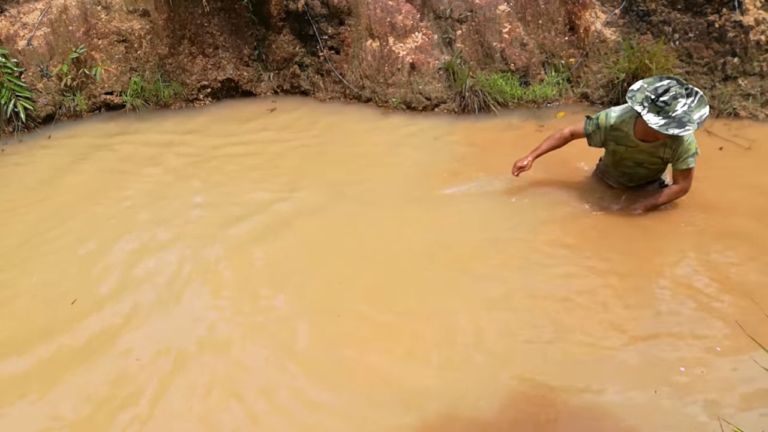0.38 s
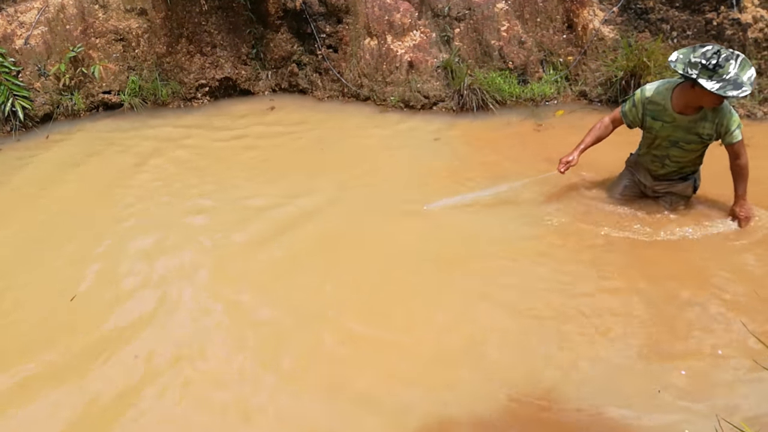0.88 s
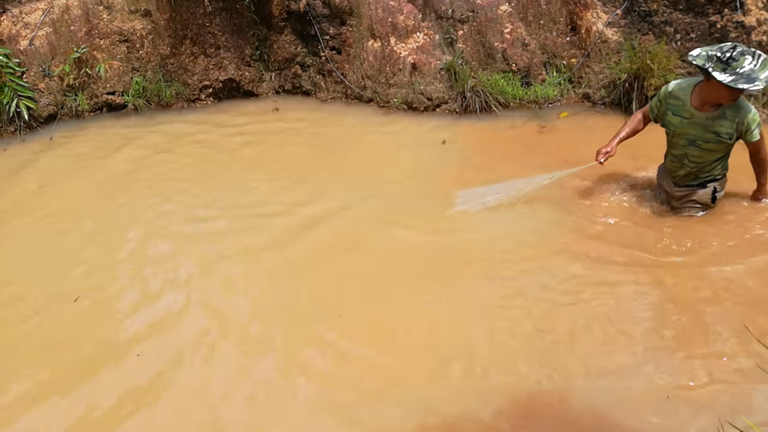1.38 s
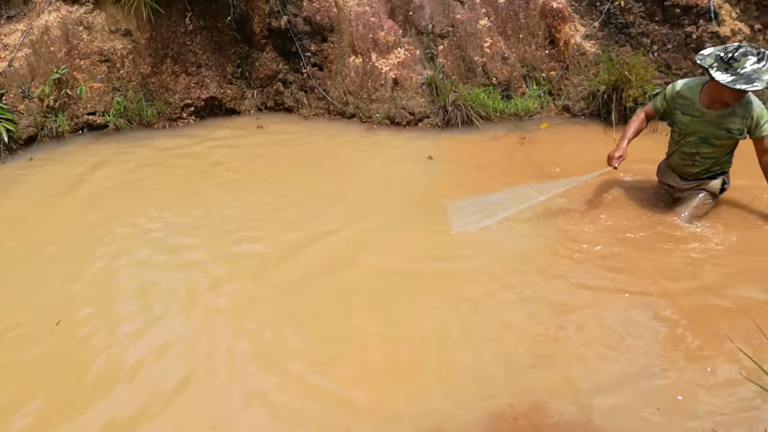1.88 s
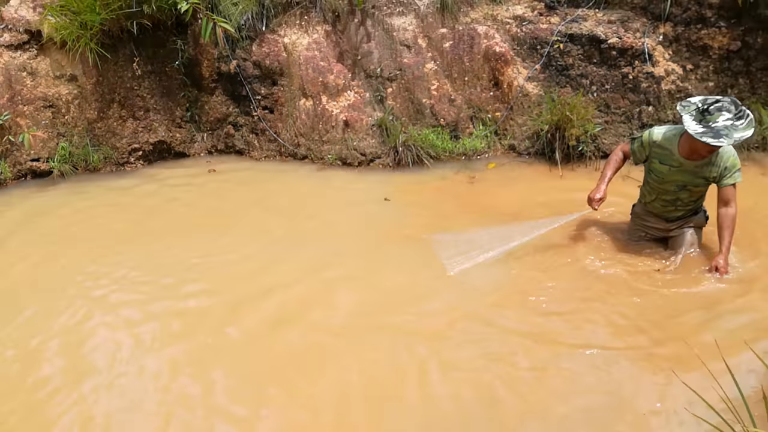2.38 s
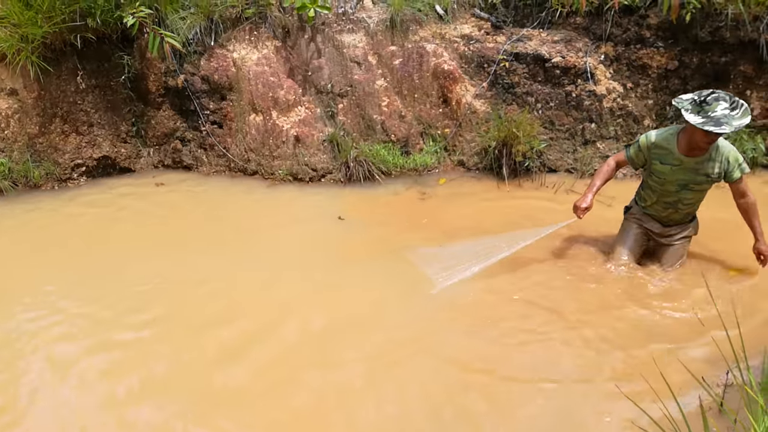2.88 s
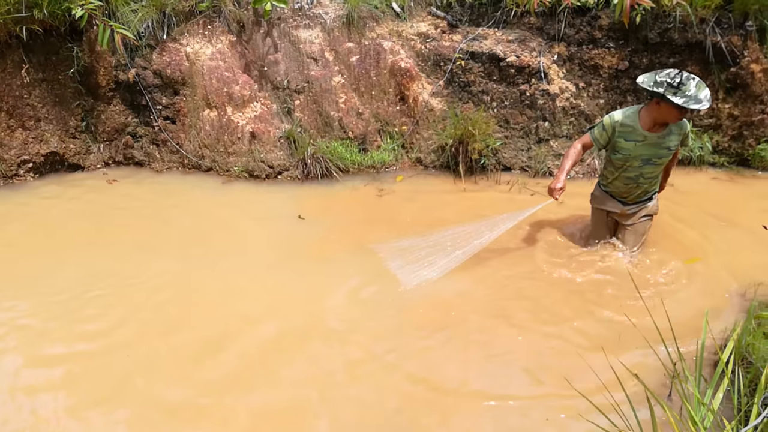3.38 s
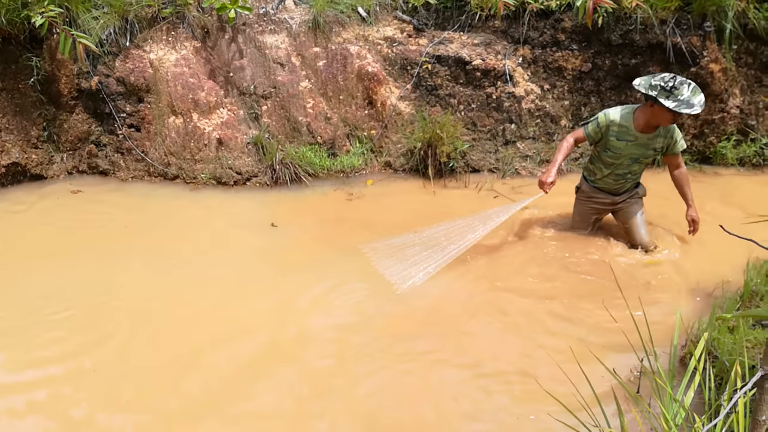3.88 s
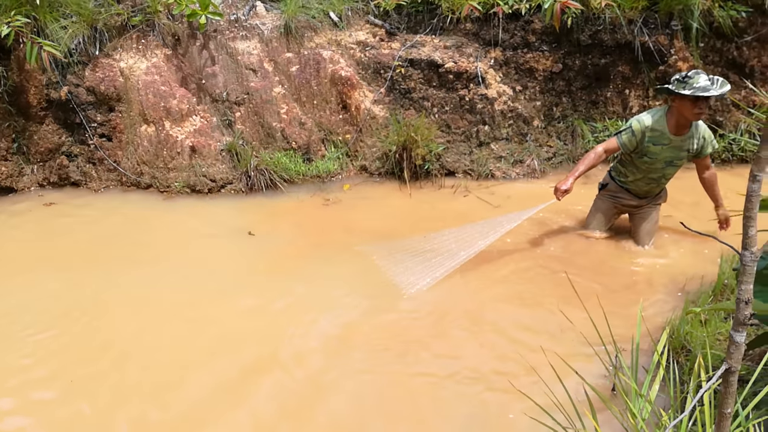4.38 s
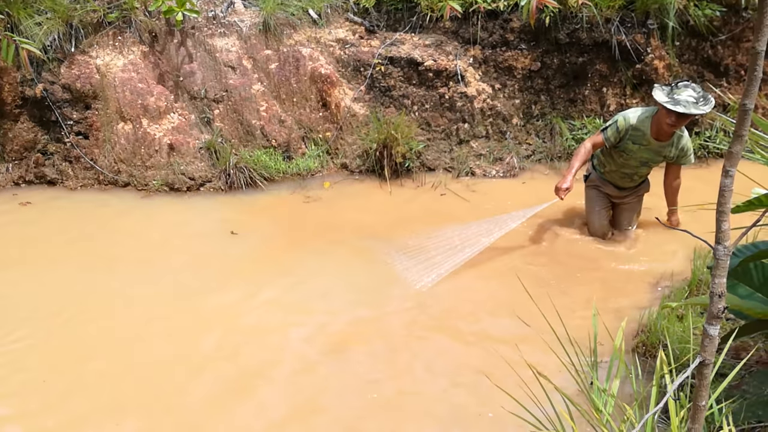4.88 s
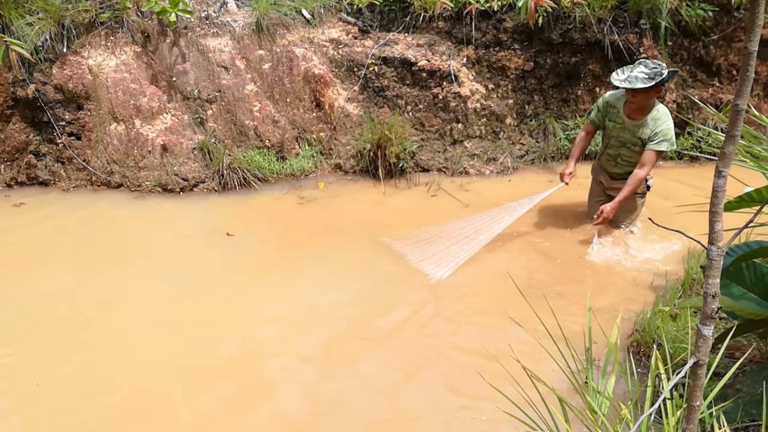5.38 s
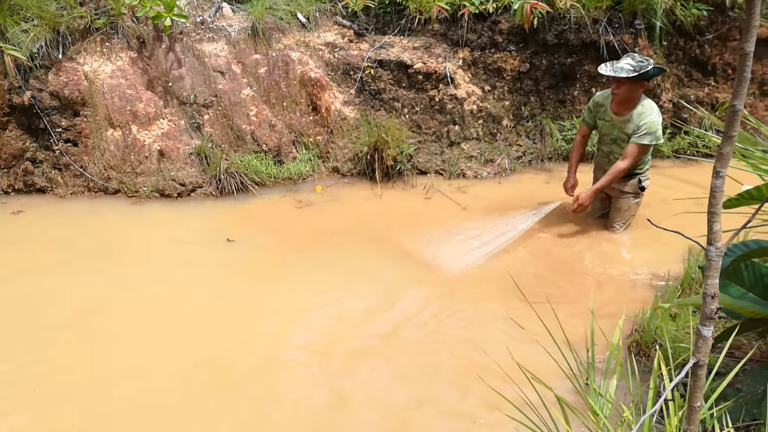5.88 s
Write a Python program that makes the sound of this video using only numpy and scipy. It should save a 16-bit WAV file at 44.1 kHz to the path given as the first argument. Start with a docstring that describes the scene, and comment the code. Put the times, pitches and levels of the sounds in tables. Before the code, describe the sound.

A stereo outdoor take beside a muddy pond, with faint hiss and a distant hush. Low wind thumps buffet the microphone in the first 0.4 seconds. From about 0.2 someone wades, sloshing bubbly water with spray and a net draining in a smooth hiss until 0.9. At 1.05 to 1.55 come stronger glugs, plops and crisp slaps. Water thins, then stirs again from 1.85 to 2.6, with softer gurgles and a short drain. Around 3.0 wind thumps return and a heavy splash with a deep plop lands at 3.2; sloshing and net hiss continue to about 4.0. A lull follows, filled by wind gusts at 4.1 to 4.75. Slosh and drain hiss resume at 4.4, with plops and slaps through 5.4. It quietens until a tiny swish at 6.0. Water is bright on the right, late and dull on the left, with a short earthy echo.

```python
"""Gusty wind buffets two microphone ports as someone wades through a muddy pond, dragging a net.
From the first stride on, the right, bubbles and spray slosh, wavelets slap and air pockets plop and glug.
Water drains through the net in smooth hisses, often while the slosh goes on; a swish comes at the end.
Noise and many small bubbles make the slosh, gliding tones the pockets, one-cycle puffs the wind.
The left port is shaded by the camera body and hears the water late and dull."""
import sys
import numpy as np
from scipy import signal
from scipy.fft import rfft, irfft, next_fast_len
from scipy.io import wavfile
from scipy.ndimage import uniform_filter1d, map_coordinates

SR = 44100
rng = np.random.default_rng(int(sys.argv[2]) if len(sys.argv) > 2 else 0)


def unload_audio(sound):
    """Save the sound as a 16-bit wav file, at the path given as the first command line argument."""
    columns = np.transpose(np.atleast_2d(sound))
    # keep every value between -1 and 1, then stretch to whole-number steps
    steps = np.round(np.clip(columns, -1, 1) * 32767)
    wavfile.write(sys.argv[1], SR, steps.astype(np.int16))


def voltage_ratio(level):
    """Linear amplitude factor for a level in decibels (scalar or array-like)."""
    return 10 ** (np.asarray(level, float) / 20)


N = 265482


def unit(x):
    """Scales a sound to an average strength (rms) of 1."""
    return x / np.sqrt(np.mean(x ** 2) + 1e-20)


def along(points, hz, axis=1):
    """Reads one column of a frequency table, with frequency on a log scale."""
    table = np.transpose(points)
    # a column that starts very low is silent below its first frequency
    below = -120 if table[axis][0] < -25 else None
    return np.interp(np.log(hz + 1), np.log(table[0] + 1), table[axis], below)


def wobble(rate):
    """A smooth random curve with this many random knots a second."""
    knots = rng.standard_normal(int(N * rate / SR) + 4)
    return map_coordinates(knots, [np.arange(N) * rate / SR])


def filtered(x, response):
    """Multiplies the spectrum of a sound by a response, which may also shift phase."""
    m = next_fast_len(N + 8192)
    hz = np.fft.rfftfreq(m, 1 / SR)
    return irfft(rfft(x, m) * response(hz), m)[..., :N]


def coloured(x, spectrum):
    """Shapes a sound by a table of frequencies and levels, then brings it to rms 1."""
    return unit(filtered(x, lambda hz: voltage_ratio(along(spectrum, hz))))


def patchy(x, depth_db, bins, frames):
    """Raises and lowers random blotches of the sound over time and frequency."""
    z = signal.stft(x, nperseg=256)[2]
    field = uniform_filter1d(rng.standard_normal(z.shape), bins, 0)
    field = uniform_filter1d(field, frames, 1)
    return signal.istft(z * voltage_ratio(depth_db * unit(field)), nperseg=256)[1][:N]


def place(s, shapes):
    """Adds up short shapes, one row for each start time in seconds."""
    at = np.round(s * SR).astype(int)[:, None] + np.arange(shapes.shape[1])
    return np.bincount(np.clip(at, 0, N).ravel(), shapes.ravel(), N + 1)[:N]


def preamp_hiss():
    """Each port's preamplifier adds its own random electrical noise."""
    # Each row: frequency in Hz, relative level in dB
    hiss_colour = [(200, -10), (350, -6), (1500, -2.5), (3000, -9), (6000, -13), (8000, -18.5),
                   (14800, -18.5), (15350, -16.5)]
    return voltage_ratio(-79.5) * coloured(rng.standard_normal((2, N)), hiss_colour)


def camera_whine():
    """Faint high camera tones whose phase drifts a little, 8 dB weaker on the left."""
    # Each row: frequency in Hz, peak level on the right in dB
    tones = [(11601, -103), (15240, -102), (15450, -99)]
    whine = np.zeros(N)
    for hz, db in tones:
        drift_rad = 0.51 * wobble(4)
        whine += voltage_ratio(db) * np.sin(2 * np.pi * hz * np.arange(N) / SR + drift_rad)
    return whine * voltage_ratio([[-8], [0]])


def far_hush():
    """A far outdoor hush: coloured noise whose level wanders slowly."""
    # Each row: frequency in Hz, relative level in dB
    hush_colour = [(200, -28), (400, 0), (1400, -6), (3500, 1), (5500, -3), (7000, -26), (9000, -45)]
    hush_db = -85 + wobble(3)
    return voltage_ratio(hush_db) * coloured(rng.standard_normal(N), hush_colour)


def wind():
    """Air swirls make a lumpy low rumble that flares higher in the lumps; puffs thump for about a cycle."""
    # Wind between the puffs. Each row: time in seconds, level in dB
    gusts = [(0.0, -43), (0.2, -45), (0.33, -56), (1.42, -60), (1.83, -70), (2.06, -73.5), (2.09, -52.5),
             (2.43, -62), (2.7, -61), (2.93, -51), (3.5, -53.5), (3.96, -61.5), (4.3, -45), (4.76, -56),
             (4.84, -68), (5.01, -64.5), (5.15, -53), (5.78, -56.5), (6.02, -65)]
    # Single puffs of air. Each row: time of the middle in seconds, level in dB, pitch in Hz,
    # level of the sharp edge in dB relative to the puff
    puffs = [(0.071, -40.5, 79.6, -27), (0.124, -31.5, 92, -12), (0.151, -32.5, 117, -25),
             (0.174, -32.5, 84, -12), (0.22, -40, 102, -21), (0.251, -37.5, 71, -21),
             (0.275, -36.5, 110, -17), (0.304, -39.5, 117, -24), (0.366, -42, 83, -8.5),
             (0.385, -40, 73, -13), (0.733, -40, 83, -23), (0.767, -38.5, 99, -14.5),
             (1.156, -36.5, 64, -35), (1.449, -40.5, 73, -28), (1.491, -46, 105, -25),
             (1.53, -43, 80.5, -22), (2.82, -46, 69, -18), (2.93, -49, 80, -7), (2.975, -34, 97, -14),
             (3.1, -33.5, 106, -12.5), (3.163, -35.5, 98, -13), (3.309, -39.5, 116, -13),
             (3.856, -40, 72.4, -13), (4.114, -38.5, 84, -30), (4.133, -38.5, 61, -35),
             (4.189, -37.5, 80, -19), (4.211, -41, 110, -11), (4.263, -46.5, 92, -12), (4.321, -38, 113, 0),
             (4.352, -34, 93, -21), (4.406, -41, 70, -25), (4.454, -33.5, 95, -13.5),
             (4.496, -33.5, 71.6, -9), (4.517, -41.5, 80, -12), (4.596, -37, 122, -15),
             (4.745, -36, 63, -26), (5.227, -40.5, 95, -6), (5.32, -43, 83.4, -7), (5.38, -45, 85, -24),
             (5.489, -43.5, 85, -13.5), (5.62, -47, 87, -16), (5.712, -49, 84, -11.5),
             (5.885, -47.5, 69.6, -30)]
    # Colours of the rumble and its upper part. Each row: frequency in Hz, relative level in dB
    rumble_colour = [(12, -31.5), (25, -0.5), (50, 2.5), (110, -5.5), (160, -14.5), (250, -51), (500, -85)]
    flap_colour = [(90, -41), (150, 2.5), (220, 0), (320, -19), (500, -50.5)]

    lumps = wobble(16)
    swirl = rng.standard_normal(N) + 0.14 * rng.standard_normal((2, N))  # mostly shared by both ports
    rumble = unit(voltage_ratio(2.6 * lumps) * coloured(swirl, rumble_colour))
    shared_flap = coloured(rng.standard_normal(N), flap_colour)
    flap = shared_flap + 0.59 * coloured(rng.standard_normal((2, N)), flap_colour)
    flare_db = 6.4 * np.minimum(lumps, 1.3) + 6.3 * wobble(45)
    flare = voltage_ratio(-14.5) * unit(voltage_ratio(flare_db) * flap)
    gust_s, gust_db = np.transpose(gusts)
    between = voltage_ratio(np.interp(np.arange(N) / SR, gust_s, gust_db)) * (rumble + flare)

    s, db, hz, edge_db = np.transpose(puffs)[:, :, None]
    t = np.arange(-1300, 1300) / SR  # the puff is strongest at zero
    phase = rng.random((len(s), 2, 1))
    body = np.exp(-(t * hz / 0.39) ** 2) * np.cos(2 * np.pi * (hz * t + phase[:, 0]))
    edge = np.exp(-(t / 0.0029) ** 2) * np.cos(2 * np.pi * (240 * t + phase[:, 1]))
    return between + place(s[:, 0] + t[0], voltage_ratio(db) * (body + voltage_ratio(edge_db) * edge))


def banks(x):
    """Earth banks send back a short echo tail, different at each port; the treble dies sooner."""
    # Each row: frequency in Hz, time to fall by 60 dB in seconds
    dying = [(300, 0.25), (2000, 0.18), (8000, 0.13)]
    hz, t, z = signal.stft(rng.standard_normal((2, SR // 4)), SR, nperseg=256)
    fading = voltage_ratio(-60 * t / along(dying, hz)[:, None])
    tail = signal.istft(z * fading, SR, nperseg=256)[1]
    tail = tail / np.linalg.norm(tail[0])
    late = np.pad(x, (250, 0))[None]  # delay in samples
    return signal.fftconvolve(late, tail, axes=1)[:, :N]


def net():
    """Water drains through the lifted net in countless tiny drops: a smooth, slightly blotchy hiss."""
    # Each row: start in seconds, length in seconds, level in dB, swell in dB per second
    draining = [(0.304, 0.58, -71, -1.5), (1.912, 0.32, -76.5, 3), (3.0, 0.96, -71.5, -5.5),
                (4.417, 0.39, -68.5, -12), (4.846, 0.48, -76, 21)]
    # Each row: frequency in Hz, relative level in dB
    trickle_colour = [(1200, -39), (1900, -1.5), (3000, -2), (4500, 4), (5600, -9.5), (7000, -29),
                      (10000, -43)]
    attack_s, release_db_per_s = 0.062, 152
    t = np.arange(N) / SR
    s, length, db, swell = np.transpose(draining)[:, :, None]
    age = np.maximum(t - s, 0)
    level_db = db + swell * np.minimum(age, length) - release_db_per_s * np.maximum(age - length, 0)
    flow = (voltage_ratio(level_db) * np.tanh(age / attack_s)).sum(0)
    trickle = coloured(rng.standard_normal(N), trickle_colour)
    return flow * unit(patchy(trickle, 2.1, bins=2, frames=20))


def swish():
    """Fast-flickering hiss under a bell-shaped swell."""
    # Each row: frequency in Hz, relative level in dB
    hiss_colour = [(590, -44), (1000, -20), (1640, -19), (2020, -12), (2480, -5), (4370, 3.5), (4960, 1),
                   (5960, -3), (15700, -26.5)]
    peak_s, width_s = 6.005, 0.015
    swell = np.exp(-((np.arange(N) / SR - peak_s) / width_s) ** 2 / 2)
    flicker_db = -47.5 + 2.2 * wobble(300)
    return swell * voltage_ratio(flicker_db) * coloured(rng.standard_normal(N), hiss_colour)


def ticks():
    """Tiny ticks of spray: short sparks of bright noise."""
    # Each row: start in seconds, level in dB before the boost and colour below
    sparks = [(0.1722, -72), (0.353, -60), (1.2138, -72), (1.2737, -68), (2.0614, -62), (2.1197, -66),
              (2.1487, -65), (3.0052, -66), (3.0456, -77), (3.1619, -65), (3.1948, -56), (3.3135, -72),
              (3.8493, -64), (4.457, -54), (4.7562, -72), (5.8543, -73)]
    # Each row: frequency in Hz, gain in dB
    sparkle_colour = [(6000, -30), (8300, 4), (10500, 6), (11800, -4), (15700, -8)]
    t60_s, boost_db = 0.02, 2.5
    s, db = np.transpose(sparks)[:, :, None]
    t = np.arange(900) / SR
    fading = voltage_ratio(db + boost_db - 60 * t / t60_s) * np.tanh(t / 0.0016)
    noise = rng.standard_normal((len(s), len(t)))
    return filtered(place(s[:, 0], fading * noise), lambda hz: voltage_ratio(along(sparkle_colour, hz)))


def slaps():
    """Wavelets and drops slap the surface: a ringing click, then droplets at scattered pitches."""
    # Each row: start in seconds, reference level in dB, pitch in Hz
    hits = [(0.171, -54, 2300), (0.179, -55, 3420), (0.3248, -38, 2130), (0.611, -43.5, 4080),
            (0.7036, -48, 5800), (0.7792, -47, 3700), (1.1975, -38.5, 2090), (1.2351, -36.5, 3770),
            (1.2473, -41, 2440), (1.2787, -38, 3650), (1.3034, -53, 2360), (1.4805, -56, 3400),
            (1.5225, -43.5, 2440), (1.947, -44.5, 1980), (2.031, -58, 3020), (2.119, -50, 4000),
            (2.149, -45, 4500), (2.307, -50.5, 2710), (2.393, -46, 3300), (2.9701, -49.5, 2920),
            (2.9967, -43.5, 3600), (3.047, -44.5, 5750), (3.0969, -44, 2960), (3.1233, -41, 2420),
            (3.196, -47, 3060), (3.3162, -42.5, 3770), (3.379, -49, 4500), (3.4863, -42, 4300),
            (3.5924, -40.5, 3450), (3.622, -42, 2730), (3.685, -53, 5550), (3.779, -48.5, 2480),
            (3.8575, -44.5, 2400), (3.906, -44.5, 3080), (4.042, -46, 2520), (4.4586, -48, 4400),
            (4.551, -57, 1880), (4.6177, -45.5, 4310), (4.7353, -49, 2860), (4.7562, -44, 3130),
            (4.96, -49, 2170), (5.008, -41.5, 3500), (5.1796, -44, 3780), (5.237, -43, 3700)]
    s, db, hz = np.transpose(hits)[:, :, None]
    t = np.arange(900) / SR
    draw = rng.random((len(s), 3, 7))  # seven droplets a slap
    late_s = 0.011 * draw[:, 0] ** 2
    f = (hz * np.exp(0.86 * (draw[:, 1] - 0.55))).reshape(-1, 1)
    size = voltage_ratio(db - 4.5 - 7.1 * draw[:, 2]).reshape(-1, 1)
    u = t * f / 9  # age in units of nine cycles
    drops = size * np.tanh(u / 0.074) * np.exp(-3.5 * u) * np.sin(2 * np.pi * f * t)
    # the first contact is a click of a few cycles
    fading = np.tanh(t * hz / 0.24) * np.exp(-t * hz / 4.0)
    click = voltage_ratio(db - 0.5) * fading * np.sin(2 * np.pi * hz * t)
    return place(s[:, 0], click) + place((s + late_s).ravel(), drops)


def bubbles():
    """Clear air pockets: each tone starts softly, glides in pitch and dies."""
    # Each row: start in seconds, peak level in dB, first pitch in Hz,
    # pitch after one length in Hz, length in milliseconds
    pockets = [(0.277, -47, 1390, 1250, 5.4), (0.209, -59, 800, 750, 14), (0.32, -47, 2250, 2110, 5.3),
               (0.354, -55.5, 370, 361, 63), (0.41, -52.5, 330, 383, 42), (0.491, -43, 1000, 1030, 6.3),
               (0.716, -44, 1220, 1220, 8.4), (0.723, -48.5, 722, 730, 15), (0.754, -47, 2180, 2150, 7.9),
               (0.818, -36.5, 1770, 1850, 1.25), (1.053, -38.5, 842, 670, 15.3),
               (1.061, -46.5, 1480, 1500, 6.7), (1.163, -46, 730, 850, 13), (1.166, -51, 290, 339, 55),
               (1.216, -34, 800, 684, 9.6), (1.281, -38, 620, 735, 6.3), (1.284, -49.5, 424, 406, 34),
               (1.32, -35.5, 1710, 1870, 3), (1.4, -55, 696, 744, 40), (1.487, -50.5, 1550, 1650, 10.5),
               (1.537, -35, 1710, 1600, 6.1), (1.654, -59, 1000, 1000, 12), (1.869, -65, 1100, 1120, 24),
               (1.961, -40, 1900, 1700, 4.4), (2.095, -53.5, 610, 633, 24), (2.167, -45.5, 700, 778, 10),
               (2.167, -46.5, 1400, 1440, 7.6), (2.174, -44.5, 570, 555, 17), (2.24, -56, 560, 585, 19),
               (2.27, -54, 1000, 1350, 7.8), (2.31, -58.5, 300, 277, 47), (2.37, -56, 292.5, 236, 79),
               (2.404, -43.5, 1860, 1610, 3.5), (2.446, -56.5, 260, 260, 33),
               (2.47, -51.5, 2260, 2520, 7.3), (2.553, -47.5, 1970, 1935, 6.4),
               (2.974, -50.5, 1250, 1170, 19), (2.973, -47.5, 820, 845, 9.7),
               (3.037, -43.5, 1710, 1770, 2.8), (3.051, -42, 636, 1350, 23),
               (3.125, -45.5, 2400, 2360, 3.7), (3.195, -26.5, 306, 370, 6.2), (3.204, -31, 866, 1040, 7.5),
               (3.205, -44, 427, 490, 19), (3.285, -43.5, 1040, 980, 4.6), (3.315, -45.5, 1000, 1080, 9.7),
               (3.619, -50, 2030, 2190, 17), (3.62, -44, 894, 805, 17), (3.701, -57, 444, 472, 19),
               (3.818, -38.5, 1080, 1104, 6.2), (3.822, -42.5, 383, 384, 26), (3.843, -46, 2090, 2075, 6.6),
               (3.865, -46, 380, 282, 15), (4.372, -61, 1060, 1120, 6.8), (4.52, -56.5, 790, 920, 17),
               (4.61, -59, 850, 890, 7.1), (4.699, -56, 1270, 1300, 7.4), (4.851, -47, 740, 870, 13.6),
               (4.935, -49.5, 598, 712, 55), (4.991, -44.5, 490, 440, 8.4), (5.063, -53.5, 470, 512, 35),
               (5.2, -45, 1250, 1070, 3.9), (5.242, -53.5, 290, 378, 27), (5.289, -40, 1010, 950, 6.4),
               (5.338, -51.5, 372, 376, 22)]
    s, db, first, last, ms = np.transpose(pockets)[:, :, None]
    t = np.arange(5000) / SR
    u = t / (ms / 1000)  # age in lengths
    hz = first + (last - first) * np.minimum(u, 1.3)  # the glide runs on to 1.3 lengths
    swell = np.tanh(u / 0.13) * np.exp(-(u / 0.62) ** 0.95) * 1.273
    tone = np.sin(2 * np.pi * np.cumsum(hz, 1) / SR)
    return place(s[:, 0], voltage_ratio(db) * swell * tone)


def froth(count, hz, spread, cycles, scatter_db, size):
    """Random small bubbles: damped sines that rise in pitch, some louder than the rest."""
    when, pitch, loud = rng.random(count), rng.standard_normal(count), rng.exponential(size=count)
    f = (hz * np.exp(spread * pitch))[:, None]
    t = np.arange(size) / SR
    u = t * f / cycles
    sizes = voltage_ratio(scatter_db * np.minimum(loud, 3))
    rising = np.sin(2 * np.pi * f * t * (1 + 0.04 * u))
    shapes = sizes[:, None] * np.tanh(u / 0.22) * np.exp(-3.5 * u) * rising
    return unit(place(when * N / SR, shapes * (f < SR / 2.6)))  # leaves out the highest pitches


def stirring(offset_db, grows):
    """Strength of one size of froth: strides hold and sag or swell, splashes rise and die; powers add."""
    # Strides and pulls that keep the water running. Each row: start in seconds, length in seconds,
    # gurgle level in dB, brightness in dB, sag in dB per second
    strides = [(0.187, 0.74, -62.5, -1, 6.5), (1.042, 0.35, -59, 2, 13.5), (1.443, 0.22, -68.5, 1.5, 17),
               (1.843, 0.24, -72, 1.5, 1), (2.07, 0.47, -63.5, -3.5, 6.5), (2.656, 0.13, -68.5, -1, 16),
               (2.868, 0.087, -69, 1.5, -1), (2.955, 0.44, -62, -2.5, -4.5), (3.418, 0.49, -61, -2, -1.5),
               (3.916, 0.11, -67.5, -13, 21), (4.49, 0.33, -68.5, 3.5, 25), (4.819, 0.32, -64, 0, -3.5),
               (5.143, 0.22, -60.5, 2, 16)]
    # Splashes over the running water. Each row: time of the peak in seconds, gurgle level in dB,
    # brightness in dB, dying time in milliseconds
    splashes = [(0.179, -77, 20.5, 17), (0.329, -56, -7, 15), (0.49, -54, -4, 61), (0.61, -79, 8, 25),
                (0.73, -68, 8.5, 30), (1.057, -44.5, -12.5, 20), (1.09, -63.5, 7, 37),
                (1.219, -47, -7.5, 19), (1.25, -54.5, -1.5, 46), (1.3, -52, 4, 23), (1.319, -51, 5.5, 12.3),
                (1.532, -71, 10, 23), (1.96, -64.5, 3.5, 23), (2.013, -63.5, 7.5, 23),
                (2.149, -60.5, 7.5, 23), (2.18, -56.5, -1.5, 75), (2.408, -60, 4, 13),
                (2.558, -54.5, -2.5, 43), (3.02, -67, 11, 36), (3.068, -52, -4, 10), (3.101, -64.5, 11, 42),
                (3.168, -63.5, 14, 44), (3.202, -44.5, 1, 20.6), (3.322, -56, 4, 25), (3.48, -69, -3, 25),
                (3.598, -50.5, 0.5, 38), (3.82, -60, 4.5, 38), (3.859, -61, 12.5, 14),
                (4.05, -79.5, 14, 18), (4.99, -55.5, -8, 52), (5.201, -60, 7.5, 54), (5.278, -55, 3, 34)]
    attack_s, release_db_per_s = 0.021, 182
    rise_share = 0.57  # rise time over dying time
    t = np.arange(N // 32 + 2) * 32 / SR  # one step every 32 samples
    s, length, db, bright_db, sag = np.transpose(strides)[:, :, None]
    age = np.maximum(t - s, 0)
    fall_db = sag * age + release_db_per_s * np.maximum(age - length, 0)
    running = voltage_ratio(db + grows * bright_db - fall_db) * np.tanh(age / attack_s)
    s, db, bright_db, ms = np.transpose(splashes)[:, :, None]
    u = (t - s) / (ms / 1000)
    bursts = voltage_ratio(db + grows * bright_db) * np.exp(-np.maximum(u, -u / rise_share))
    power = (running ** 2).sum(0) + (bursts ** 2).sum(0)
    return voltage_ratio(offset_db) * np.interp(np.arange(N) / SR, t, np.sqrt(power))


def slosh():
    """Strides stir froth and blotchy noise in three sizes; all flicker together as wavelets break."""
    # Colours from large to fine froth. Each row: frequency in Hz, relative level in dB
    gurgle_colour = [(200, -46), (330, -5), (450, -13.5), (580, -11.5), (800, -2), (1100, 0.5), (1600, -3),
                     (2200, 1), (4000, -76)]
    spray_colour = [(900, -62), (1700, -3), (2300, -0.5), (3400, 3.5), (4300, -2), (6500, -53)]
    mist_colour = [(2500, -27), (3800, -9), (4500, 0), (5700, -2), (6800, -8.5), (8000, -14.5),
                   (11000, -19), (15700, -29)]

    breaking = voltage_ratio(1.3 * wobble(60))
    low = froth(count=3500, hz=1000, spread=0.5025, cycles=10.4, scatter_db=4.0, size=900)
    low = low + 1.1 * rng.standard_normal(N)
    high = froth(count=13000, hz=2684, spread=0.284, cycles=14.2, scatter_db=9.0, size=320)
    high = high + 1.3 * rng.standard_normal(N)
    fine = froth(count=18000, hz=5230, spread=0.316, cycles=22, scatter_db=13.0, size=200)
    fine = fine + 1.33 * rng.standard_normal(N)

    gurgle = unit(breaking * patchy(coloured(low, gurgle_colour), 4.45, bins=2, frames=12))
    spray = unit(breaking * patchy(coloured(high, spray_colour), 3.1, bins=3, frames=16))
    mist = unit(breaking * patchy(coloured(fine, mist_colour), 2.8, bins=4, frames=10))
    # brightness leaves the gurgle alone and sways the mist more than the spray
    water = stirring(0, grows=0) * gurgle
    water = water + stirring(-4.5, grows=1) * spray
    return water + stirring(-11, grows=1.37) * mist


def scene():
    """Sound reaching the two ports: water with echoes, wind and a far outdoor hush."""
    water = slosh() + net() + bubbles() + slaps() + ticks() + swish()
    return water + voltage_ratio(-14) * banks(water) + wind() + far_hush()


def ports(dry):
    """The camera body shades and delays the left port; the right port faces the water and is lifted."""
    # Left port. Each row: frequency in Hz, gain in dB, extra phase lag in radians
    left_port = [(39.8, 1.5, 0.06), (176, 1, 0.36), (302, -0.5, 0.79), (447, 1, 0), (665, -5, 1.25),
                 (870, -15, 1.1), (1080, -9, 0.59), (1350, -0.5, 2), (1560, 0, 1.1), (1850, -9, 1.12),
                 (2480, -15.5, -2), (4860, -19.5, -0.5), (7000, -60, 2), (12000, -48, 0.6)]
    # Right port. Each row: frequency in Hz, gain in dB
    right_port = [(200, 1.5), (400, 1.5), (700, 2.5), (1000, 3.5)]
    lag_samples = 26

    def shade(hz):
        """Left port's gain, with the phase lag of a late arrival."""
        lag_rad = along(left_port, hz, axis=2) + 2 * np.pi * hz * lag_samples / SR
        return voltage_ratio(along(left_port, hz)) * np.exp(-1j * lag_rad)

    left = filtered(dry[0], shade)
    right = filtered(dry[1], lambda hz: voltage_ratio(along(right_port, hz)))
    return np.array([left, right])


def top_cut(x):
    """Nothing passes above the cut-off."""
    return signal.sosfilt(signal.butter(12, 16390, fs=SR, output="sos"), x)


def record(dry):
    """The ports pick up the scene; preamplifier hiss and the camera's whine join in."""
    mix = ports(dry) + preamp_hiss() + camera_whine()
    return top_cut(mix)


dry = scene()
out = record(dry)
unload_audio(out)
```